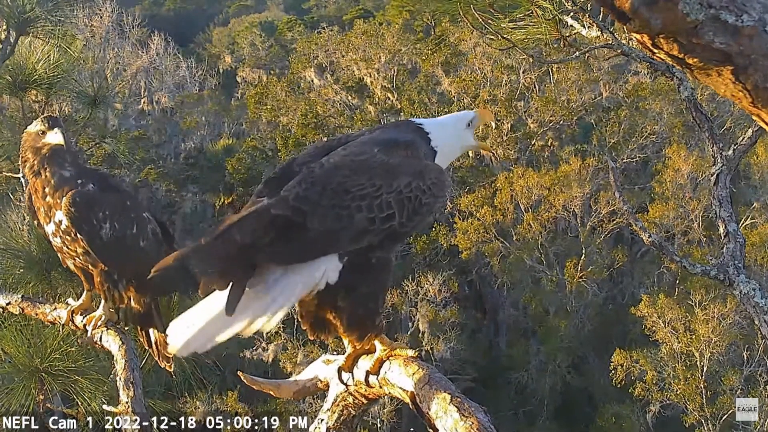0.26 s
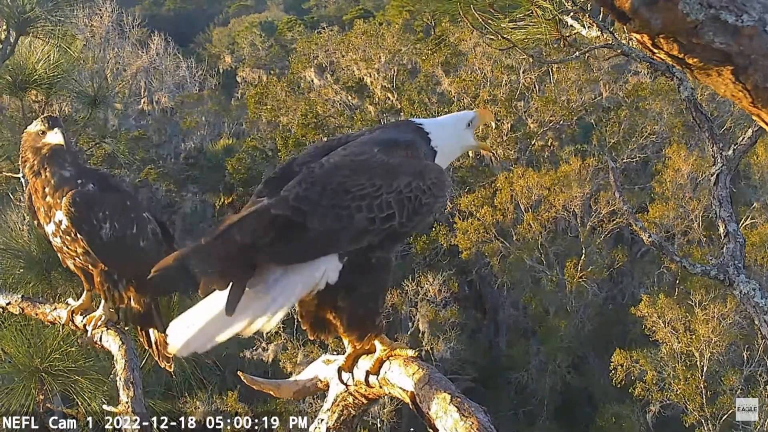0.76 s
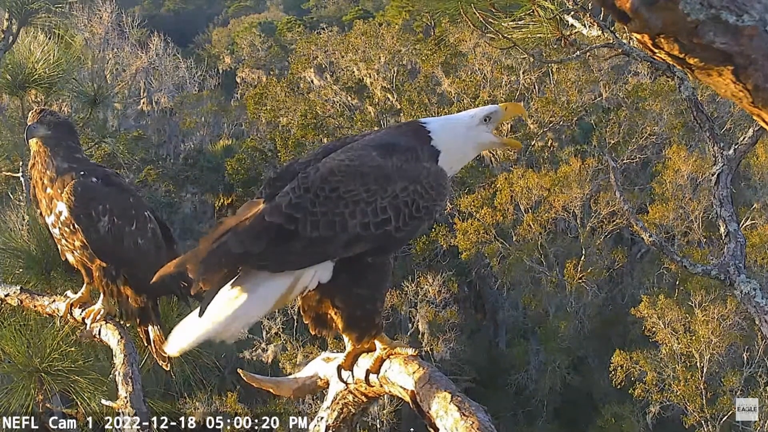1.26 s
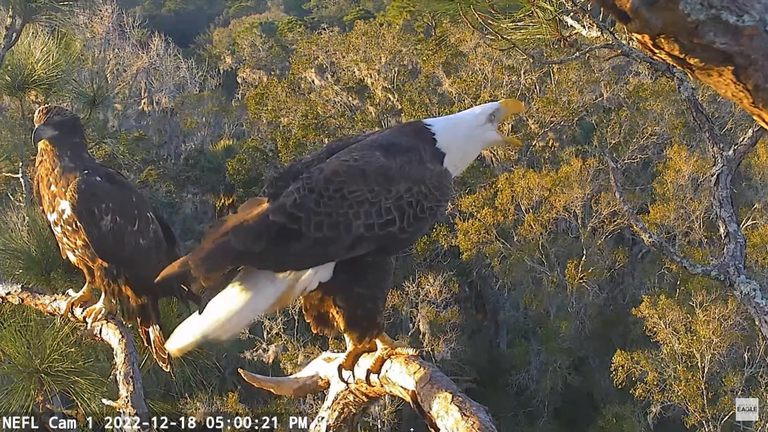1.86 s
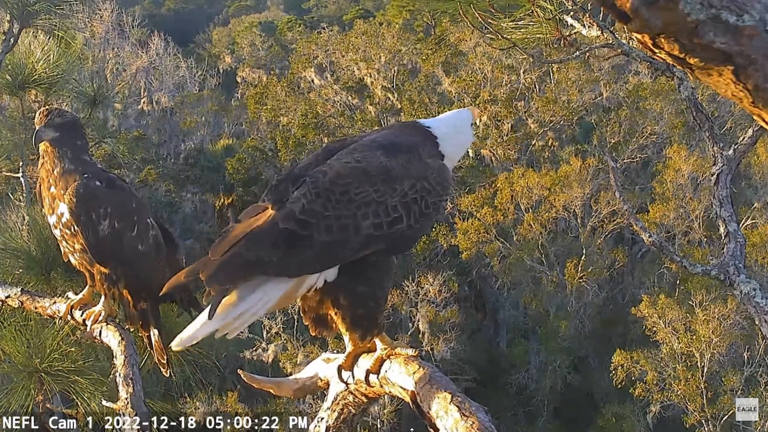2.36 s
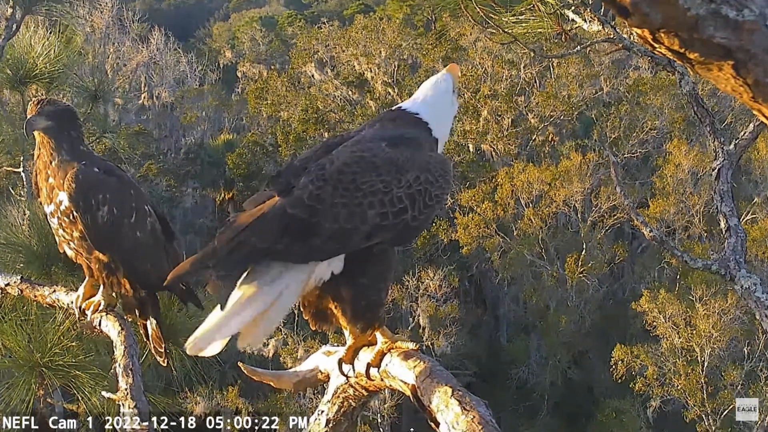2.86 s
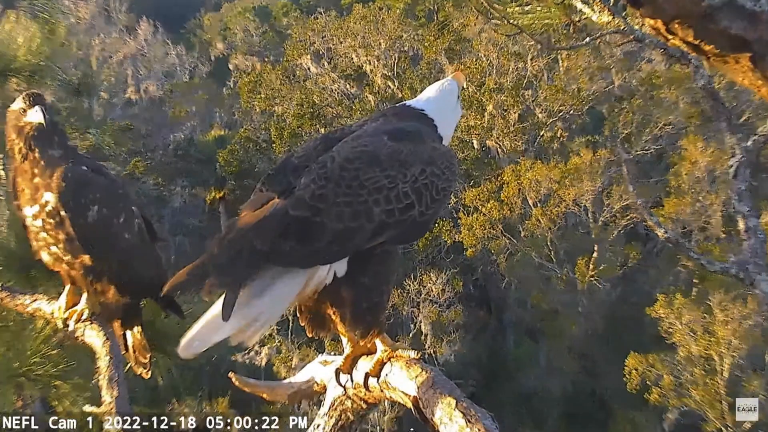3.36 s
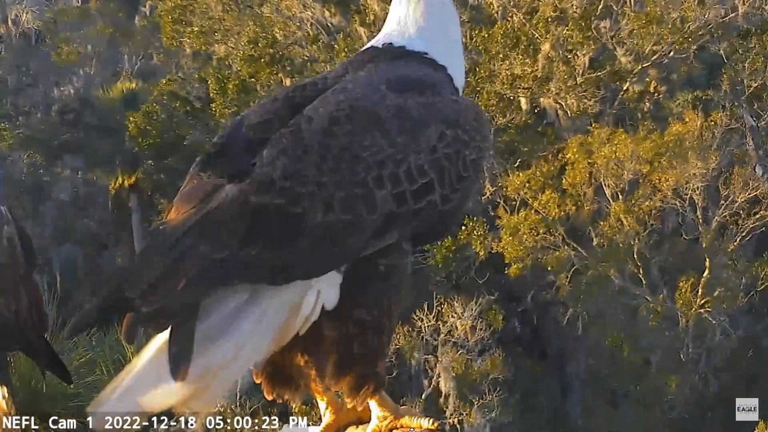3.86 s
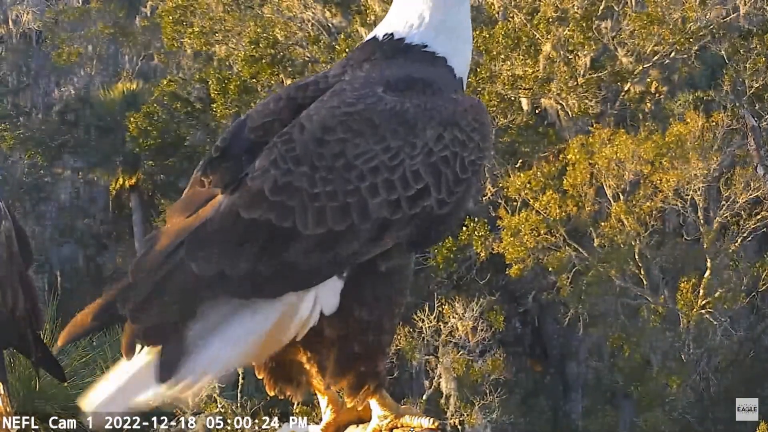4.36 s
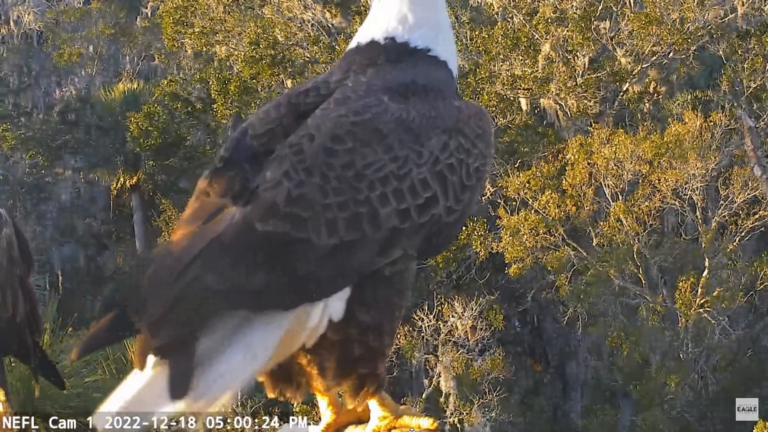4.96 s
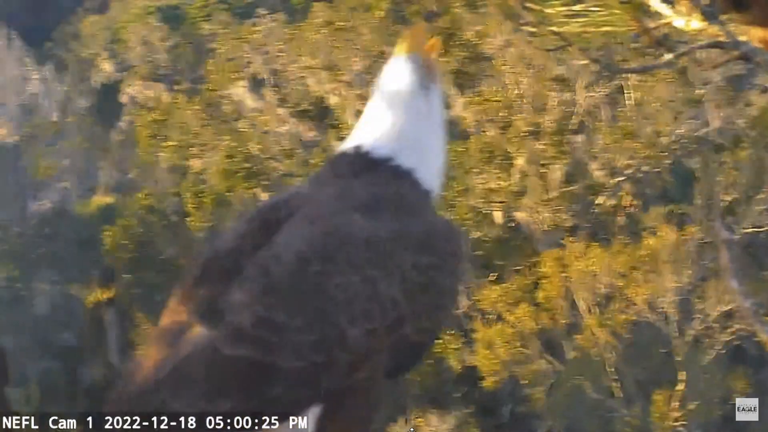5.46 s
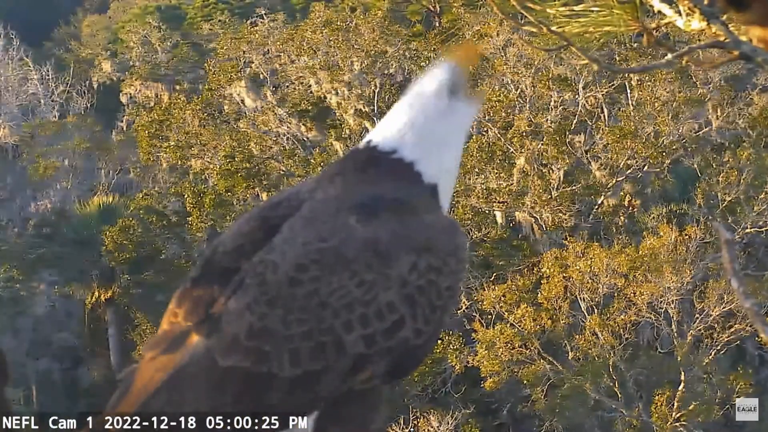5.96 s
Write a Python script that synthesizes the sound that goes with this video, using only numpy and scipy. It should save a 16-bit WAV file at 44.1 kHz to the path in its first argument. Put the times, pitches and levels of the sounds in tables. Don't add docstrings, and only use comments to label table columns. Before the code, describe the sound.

A close eagle chitters in rapid high whistles and squeaks, then a second answers with quick rising yelps and throaty chuckles, outdoors among trees.

```python
import sys
import numpy as np
from scipy import signal
from scipy.fft import rfft, irfft, next_fast_len
from scipy.io import wavfile
from scipy.ndimage import uniform_filter1d

SR = 44100
rng = np.random.default_rng(int(sys.argv[2]) if len(sys.argv) > 2 else 0)


def master(y):
    cut = np.clip(np.atleast_2d(y).T, -1, 1)
    pcm = np.round(cut * 32767)
    wavfile.write(sys.argv[1], SR, pcm.astype(np.int16))


def field_ratio(decibels):
    return 10 ** (np.asarray(decibels, dtype=float) / 20)


N = 272979

THIN_DB = -4.5
TICK_S = .0015


def rms_one(x):
    return x / np.sqrt(np.mean(x ** 2) + 1e-20)


def at_hz(points, hz):
    points = np.array(points)
    return np.interp(np.log(hz), np.log(points[:, 0]), points[:, 1])


def band(x, low_hz, high_hz):
    return signal.sosfilt(signal.butter(2, [low_hz, high_hz], "band", fs=SR, output="sos"), x)


def drift(rate_hz):
    smooth = signal.butter(2, rate_hz, fs=SR, output="sos")
    settled = signal.sosfilt(smooth, rng.standard_normal(N + SR))[SR:]
    return rms_one(settled)


def resonance(hz, peak_hz, width_hz):
    ring = 1 / (1 + 2j * (hz - peak_hz) / width_hz)
    return ring * np.abs(ring)


def swell(s, length, skew, flat):
    span = np.arange(round((s - .002) * SR), min(N, round((s + length + .002) * SR)))
    along = (span - span[0] + .5) / (length + .004) / SR
    puff = np.sin(np.pi * np.clip(along, 0, 1) ** skew) ** flat
    return span, along, puff


def background(patchy_db):
    # (frequency [Hz], density [dB per Hz])
    colour = [(18, -67), (30, -37), (247, -0.5), (581, -14.5), (859, -14), (1030, -28.5), (1200, -12),
              (2310, -27.5), (2630, -27), (13200, -41), (15000, -80)]
    floor_db, whine_hz, whine_db = -35.5, 13050, -66
    twig_s, twig_db = 3.186, -16
    size = next_fast_len(N)
    hz = np.maximum(np.arange(size // 2 + 1) * SR / size, 1)
    spectrum = rfft(rng.standard_normal((2, size))) * field_ratio(at_hz(colour, hz))
    noise = rms_one(irfft(spectrum, size)[:, :N])
    flicker = (field_ratio(patchy_db * drift(8.4)) - 1) * band(noise[0], 18, 1400)
    whine = field_ratio(whine_db) * rms_one(band(rng.standard_normal(N), whine_hz - 20, whine_hz + 20))
    twig = np.zeros(N)
    twig[round(twig_s * SR)] = field_ratio(twig_db)
    snap = band(band(twig, 3000, 11000), 3000, 11000)
    mid = field_ratio(floor_db) * (noise[0] + flicker) + whine + snap
    side = field_ratio(floor_db - 22.5) * band(noise[1], 270, 590)
    return mid + side * [[1], [-1]]


def whistles(flutter_db, breath_db, rattle_db):
    overtones = [-18.5, -25, -40, -34]
    # (frequency [Hz], level [dB])
    beak = [(2500, -10), (3700, -8), (4800, -13.5), (6100, -1.5), (7300, -1.5), (9000, -7.5), (12000, -19),
            (15500, -9.5)]
    pitch_waver, level_rasp, haze_db = .013, .45, -9.5
    out, air, weak = np.zeros(N), np.zeros(N), np.zeros(N)
    waver, rasp, flutter = drift(130), drift(290), field_ratio(flutter_db * drift(190))
    rows = score()
    for (s, length, start, middle, end, db, edge_db), turn in zip(rows, rng.random(len(rows))):
        span, u, puff = swell(s, length, skew=.8, flat=np.clip(.02 / length, .7, 2))
        shaky = np.clip(-db / 18, .1, 1) ** 1.3 * min(1, 4000 / middle) ** 2
        hz = start + (end - start) * u + 2 * (2 * middle - start - end) * u * (1 - u)
        cycles = np.cumsum(hz * (1 + pitch_waver * shaky * waver[span])) / SR
        phase = 2 * np.pi * (cycles + turn)
        tone = np.sin(phase)
        for k, level_db in enumerate(overtones, start=2):
            partial_db = level_db + edge_db - 8.1 * (k - 3) * shaky + at_hz(beak, k * hz)
            level = field_ratio(partial_db) * (k * middle < 16000) * flutter[span]
            tone += level * np.sin(k * phase)
        blown = field_ratio(db) * puff
        out[span] += blown * tone * (1 + level_rasp * shaky * rasp[span])
        air[span] += blown
        weak[span] += blown * (middle > 3700 and db < -11 or length <= TICK_S)
    hiss = band(band(rng.standard_normal(N), 3000, 8500), 3000, 8500)
    breath = rms_one(hiss) * np.tanh(air * 6) / 6
    crackle = rng.standard_normal(N) * (rng.random(N) < .03)
    crackle = crackle * uniform_filter1d(np.tanh(weak * 8), size=1500)
    crackle = signal.sosfilt(signal.butter(4, 7500, fs=SR, output="sos"), crackle)
    rattle = band(crackle, 3500, 3700) + band(crackle, 1560, 2040) / 2
    rattle = rattle + field_ratio(haze_db) * band(crackle, 850, 7300)
    return out + field_ratio(breath_db) * breath + field_ratio(rattle_db) * rattle


def score():
    rows = plain_notes() + bends() + snapped_notes() + brassy_notes() + strokes() + openers()
    rows += ticks() + squeaks() + slumps() + climbs() + slides() + held_notes() + stairs()
    return rows


def note(s, length, hz, db):
    # (frequency [Hz], change [share])
    glide = [(1350, -0.073), (1800, 0.08), (2350, 0.055), (2950, 0.016), (3400, 0.03), (4400, 0.052),
             (5700, -.05)]
    # (frequency [Hz], level [dB])
    edge = [(1350, 3.5), (1800, 7), (2300, 11), (2950, -1.5), (3400, -1.5), (4400, 3), (5500, 1),
            (7000, -15)]
    half = at_hz(glide, hz) / 2
    return s, length, hz * (1 - half), hz, hz * (1 + half), db, at_hz(edge, hz) + 0.24 * (db + 4.5)


def straight(s, length, start, end, db, edge_db):
    return s, length, start, (start + end) / 2, end, db, edge_db


def plain_notes():
    # (time [s], length [s], pitch [Hz], level [dB])
    low = [(0.05, 0.018, 2524, -25), (0.22, 0.018, 2430, -25), (0.225, 0.017, 1363, -21),
           (0.049, 0.036, 1570, -37), (1.16, 0.008, 1510, -20), (1.164, 0.0095, 2278, -11.5),
           (1.173, 0.019, 2394, -19.5), (1.313, 0.018, 1404, -23.5), (1.676, 0.014, 2600, -25),
           (1.991, 0.008, 2530, -32), (1.632, 0.0084, 1200, -27.5), (1.814, 0.017, 2524, -23.5),
           (1.959, 0.018, 2280, -35.5), (1.969, 0.015, 1414, -27.5), (1.984, 0.01, 1346, -12),
           (2.473, 0.015, 2467, -8.5), (2.487, 0.016, 2450, -20), (2.698, 0.0058, 1310, -19),
           (2.808, 0.013, 1285, -25.5), (3.786, 0.019, 1840, -15), (3.958, 0.012, 2410, -25),
           (5.821, 0.006, 2220, -18), (5.822, .008, 2750, -27), (1.546, 0.019, 2260, -13.5),
           (5.91, 0.0075, 2340, -22), (6.186, 0.0098, 1820, -19.5)]
    # (time [s], length [s], pitch [Hz], level [dB])
    middle = [(0.052, 0.026, 3363, -12), (0.332, 0.015, 2974, -2), (3.703, 0.025, 2900, -10.5),
              (1.377, 0.013, 3080, -25), (1.449, 0.0038, 3520, -16), (1.471, 0.013, 3370, -6),
              (1.574, 0.023, 3400, -17.5), (1.697, 0.0062, 3396, -5), (1.707, 0.0096, 3416, -13.5),
              (2.088, 0.022, 2961, -4), (3.439, 0.032, 3226, -17), (3.536, 0.02, 3370, -25),
              (3.666, 0.011, 3550, -11.5), (3.795, 0.0058, 3430, -4), (3.815, 0.015, 3400, -17),
              (3.952, 0.033, 3180, -22), (5.686, 0.0085, 3535, -2.5), (5.701, 0.0063, 3470, -9.5),
              (5.708, 0.02, 3450, -21), (5.84, 0.0092, 3340, -11.5), (5.846, .014, 3310, -23),
              (4.475, 0.018, 2386, -13.5), (4.174, 0.0087, 2964, -7), (4.187, 0.023, 3040, -24),
              (0.002, 0.098, 3470, -42.5), (3.546, .012, 3570, -27)]
    # (time [s], length [s], pitch [Hz], level [dB])
    high = [(0.003, 0.1, 4760, -44), (1.179, 0.0069, 3920, -17.5), (1.332, 0.014, 3870, -23),
            (1.49, 0.02, 4400, -28), (1.338, 0.039, 4140, -20), (1.395, 0.029, 3930, -25),
            (1.424, 0.012, 4230, -19), (1.432, 0.015, 4300, -11), (1.448, 0.0028, 4200, -16),
            (1.453, .005, 4340, -6), (1.457, 0.023, 4356, -14), (1.542, 0.0073, 3980, -22),
            (1.548, 0.027, 4410, -14), (1.667, .021, 4480, -22), (1.165, 0.0085, 4560, -24),
            (1.551, 0.013, 4720, -21), (2.087, 0.0085, 3820, -17), (2.174, 0.031, 3890, -29),
            (3.513, 0.014, 4530, -8.5), (3.526, 0.02, 4550, -11), (3.535, 0.017, 4450, -20),
            (3.504, 0.0042, 4400, -19), (3.725, 0.14, 4360, -36.5), (1.7, 0.011, 4470, -28),
            (3.55, 0.04, 4600, -25), (3.644, 0.0096, 4390, -16.5), (3.646, 0.032, 4630, -19.5),
            (5.471, 0.0077, 3940, -16), (5.534, 0.0091, 4600, -9), (5.539, 0.0063, 4390, 0.5),
            (5.543, 0.011, 4490, 0), (5.553, 0.0056, 4490, 1), (5.56, 0.0063, 4513, -2.5),
            (5.564, 0.0093, 4497, -11), (5.661, 0.0079, 4300, -12.5), (5.667, 0.013, 4500, -15)]
    # (time [s], length [s], pitch [Hz], level [dB])
    top = [
        (1.56, 0.009, 5290, -23),
        (2.245, 0.014, 6600, -22),
        (3.498, 0.005, 5800, -7),
        (3.506, 0.0088, 5500, -6.5),
        (3.519, 0.0087, 5490, -17),
        (3.636, 0.0032, 5500, -13.5),
        (5.52, 0.0066, 6460, -11.5),
        (5.527, 0.0047, 5690, -4),
        (5.529, 0.0072, 5400, -15.5),
    ]
    return [note(*row) for row in low + middle + high + top]


def woods(x, near_db, near_t60, far_db, far_t60):
    needles_db, needles_t60, bough_s, bough_db = -27.5, 0.06, 0.0098, -25.5
    still, sway_hz = .5, 90
    t = np.arange(SR // 2) / SR
    sparse = rng.standard_normal(len(t)) * (rng.random(len(t)) < .15)
    near = field_ratio(near_db) * rms_one(sparse) * field_ratio(-60 * t / near_t60) * (t > .004)
    far = field_ratio(far_db - 60 * t / far_t60) * rng.standard_normal(len(t))
    needles = field_ratio(needles_db - 60 * t / needles_t60) * rms_one(sparse[::-1]) * (t > .004)
    needles[round(bough_s * SR)] += field_ratio(bough_db)
    far = band(band(far, 1300, 7600), 1200, 7600)
    trunks = signal.fftconvolve(x * (still + drift(sway_hz)), far)[:N]
    branches = band(band(needles, 4900, 8600), 4900, 9300) + band(near, 680, 9100)
    return signal.fftconvolve(x, branches)[:N] + trunks


def bends():
    # (time [s], length [s], from [Hz], to [Hz], level [dB])
    bent = [(.364, 0.0024, 5500, 7100, -31), (.367, 0.017, 6980, 7440, -15),
            (0.388, 0.0049, 7560, 7850, -21), (0.391, 0.02, 7830, 5200, -17.5),
            (1.323, 0.015, 6100, 5870, -21), (1.334, 0.011, 5870, 4960, -24.5),
            (1.348, .006, 7860, 8800, -25), (1.354, 0.011, 8700, 7900, -28),
            (1.388, 0.016, 7500, 8000, -33), (1.431, .006, 9200, 8700, -26),
            (1.447, 0.0087, 8000, 7870, -25), (1.547, .008, 8560, 9300, -28),
            (1.557, 0.024, 10800, 9200, -30.5), (1.674, 0.013, 8200, 7800, -30),
            (2.09, 0.011, 9900, 9800, -37), (2.37, 0.022, 6100, 6200, -29.5),
            (1.406, 0.011, 3710, 4190, -29), (1.348, .005, 4570, 3500, -22),
            (1.362, 0.0054, 4400, 3300, -25), (1.438, 0.0046, 4480, 3370, -24),
            (0.065, .01, 7550, 8300, -27.5), (.057, 0.012, 10200, 9900, -32.5),
            (5.034, 0.0087, 3630, 4500, -26), (3.468, 0.013, 7000, 8300, -30),
            (3.575, 0.0074, 6740, 5770, -31), (3.633, 0.0087, 5650, 4680, -25),
            (3.648, .008, 5300, 4600, -18.5), (3.658, .008, 4500, 5030, -30),
            (5.39, 0.0073, 6820, 8260, -31), (3.34, .01, 6050, 5200, -21), (3.646, 0.011, 8300, 8150, -28),
            (3.67, 0.0085, 8240, 7900, -34), (3.63, 0.02, 7200, 7300, -46), (4.45, 0.018, 3750, 3580, -24),
            (4.7, .015, 3680, 3530, -32), (5.04, 0.013, 3670, 4060, -29.5), (5.615, 0.01, 3840, 4600, -31),
            (5.826, 0.021, 3450, 3105, -7), (5.884, 0.017, 4360, 4910, -40)]
    return [straight(*row, 5 if row[2] < 5000 else THIN_DB) for row in bent]


def snapped_notes():
    # (time [s], length [s], pitch [Hz], level [dB], tail level [dB])
    snaps = [
        (0.059, 0.005, 3414, -8, -23),
        (1.184, .014, 2998, 2.5, -31),
        (1.823, 0.0087, 3347, -2.5, -14),
        (2.368, 0.0082, 3066, -10, -23),
        (2.582, .011, 2080, -8.5, -20.5),
        (3.323, 0.0076, 2750, -7.5, -26),
        (3.596, 0.0046, 2950, -7, -22),
    ]
    rows = []
    for s, length, hz, db, tail_db in snaps:
        rows += [note(s, length, hz, db), note(s + length, .023, hz, tail_db)]
    return rows


def brassy_notes():
    # (time [s], length [s], pitch [Hz], level [dB])
    brassy = [
        (0.061, 0.0044, 4020, -23),
        (0.343, 0.017, 3023, -5.5),
        (0.356, 0.018, 3038, -12),
        (1.674, 0.0082, 4050, -22),
        (1.678, 0.021, 3473, -2.5),
        (1.832, 0.008, 4130, -20),
        (3.596, 0.026, 3010, -12),
        (3.801, 0.004, 3474, -5.5),
        (3.808, 0.006, 3476, -5),
        (5.672, 0.019, 3478, -3.5),
    ]
    rows = [note(*row) for row in brassy]
    return [(*row[:-1], row[-1] + 11.5) for row in rows]


def strokes():
    # (time [s], length [s], from [Hz], to [Hz], level [dB])
    thin = [(0.587, 0.0074, 5500, 4730, -29.5), (0.31, 0.02, 5400, 7660, -30),
            (3.302, 0.0063, 5250, 6830, -28.5), (3.464, 0.0036, 5900, 8360, -26),
            (0.597, 0.0083, 4520, 3970, -25), (.609, 0.0036, 4180, 3240, -29),
            (1.323, .002, 5200, 7100, -23), (1.446, 0.011, 2320, 2980, -15),
            (1.458, 0.0078, 3680, 3370, -19), (1.338, .018, 6000, 5840, -29),
            (1.432, 0.0047, 6250, 4770, -22), (2.236, 0.009, 6340, 4930, -26),
            (2.272, .005, 4400, 3300, -25), (2.344, .004, 7900, 6500, -24), (2.344, 0.015, 5850, 4860, -24),
            (2.444, 0.016, 5020, 6970, -30), (2.47, 0.0067, 5700, 3600, -21),
            (3.331, 0.0065, 5200, 6100, -16.5), (3.396, 0.0043, 5950, 5060, -19),
            (3.45, 0.0051, 4860, 5800, -22), (3.467, .006, 4450, 4920, -25), (3.474, 0.01, 6500, 5400, -19),
            (3.486, 0.0078, 5800, 6800, -17), (3.496, .018, 6700, 6550, -24), (3.568, .01, 5400, 6450, -27),
            (3.584, .005, 5730, 5200, -17), (3.636, 0.015, 5400, 5200, -32),
            (5.388, 0.0087, 3400, 4050, -21), (5.519, 0.0061, 5500, 6600, -18),
            (5.555, 0.03, 3510, 3420, -27)]
    return [straight(*row, THIN_DB) for row in thin]


def openers():
    # (time [s], level [dB])
    phrases = [
        (0.31, -26),
        (1.155, -26),
        (2.062, -20.5),
        (3.301, -23),
    ]
    sweep_hz = (2750, 3110, 3770)
    rows = []
    for s, db in phrases:
        rows += [(s, .024, *sweep_hz, db, 0), note(s, .027, 1956, db - 8.5)]
    return rows


def ticks():
    # (time [s], level [dB])
    loose = [(0.408, -17), (0.438, -21), (0.4587, -21.5), (0.4865, -27), (0.5046, -9.5), (0.5356, -20),
             (0.5684, -27), (0.6028, -14), (0.6137, -21), (0.635, -27), (0.6874, -26), (1.297, -22),
             (1.347, -15), (1.378, -20), (1.445, -9), (2.2128, -21), (2.2628, -7), (2.2928, -19),
             (2.3056, -26), (4.4867, -26)]
    # (time [s], level [dB])
    between = [(4.232, -19.5), (4.254, -14.5), (4.277, -17), (4.3, -17), (4.509, -16), (4.534, -39),
               (4.726, -16), (4.778, -21), (4.798, -19), (5.078, -35), (5.0864, -12), (5.102, -19),
               (5.1095, -16), (5.132, -21), (5.374, -11.5), (5.398, -15), (5.664, -8), (5.938, -23)]
    chirp_hz = (3750, 3150, 2800)
    return [(s - TICK_S / 2, TICK_S, *chirp_hz, db, -20) for s, db in loose + between]


def grunts(jitter, rasp_db):
    # (time [s], length [s], throat level [dB], chest level [dB])
    loose = [(0.446, 0.0089, -22, -26.5), (0.51, 0.023, -25, -30), (0.537, 0.012, -7.5, -20),
             (0.619, 0.007, -12, -23.5), (1.297, 0.0086, -14.5, -21.5), (1.382, 0.0087, -11, -19.5),
             (1.463, 0.0047, -12.5, -22), (2.298, 0.0072, -10.5, -18.5), (2.379, 0.0045, -13, -21.5),
             (3.422, 0.015, -23, -26), (3.442, 0.0022, -11.5, -21), (3.504, 0.002, -18, -20),
             (3.522, 0.011, -13, -23.5), (0.426, 0.003, -27, -23), (0.462, 0.0058, -19.5, -31),
             (2.2, 0.0089, -25, -33), (3.372, 0.02, -24.5, -37)]
    # (time [s], length [s], throat level [dB], chest level [dB])
    chuckle = [(4.191, 0.0089, -11, -24.5), (4.208, 0.015, -7, -14), (4.237, 0.0097, -11, -22),
               (4.258, 0.01, -13.5, -20), (4.286, 0.0055, -16, -26.5), (4.309, 0.01, -13, -30),
               (4.323, 0.024, -11.5, -17.5), (4.493, 0.0087, -18, -31), (4.515, 0.0076, -7.5, -31),
               (4.532, 0.0067, -14, -28), (4.732, 0.014, -8, -32), (4.751, 0.021, -12, -18.5),
               (4.78, 0.012, -9.5, -21.5), (4.8, 0.016, -10.5, -17), (4.819, 0.014, -14, -23),
               (5.072, 0.0064, -19, -25), (5.092, 0.013, -9.5, -23.5), (5.117, 0.0095, -7, -21),
               (5.134, 0.027, -10.5, -14.5), (5.36, 0.0032, -15, -28), (5.384, 0.0067, -8, -22.5),
               (5.406, 0.0055, -6.5, -27), (5.419, 0.024, -12, -16), (5.647, 0.0085, -14.5, -37),
               (5.669, 0.009, -7, -20), (5.687, 0.026, -12.5, -15.5), (5.925, 0.0035, -12.5, -26),
               (5.946, 0.011, -10, -23.5), (5.964, 0.029, -11.5, -13.5)]
    # (frequency [Hz], width [Hz], level [dB])
    formants = [
        (710, 400, -14),
        (1483, 180, 0.5),
        (2774, 230, -11.5),
        (5500, 7300, -42),
    ]
    base_hz, lower_hz_per_s = 450.8, 2140
    sag, chest_delay_s, hiss_db = 0.068, 0.0022, -31
    out, gate, unsteady = np.zeros(N), np.zeros(N), 1 + jitter * drift(99.0)
    orders = np.arange(2, 22)[:, None]
    for s, length, throat_db, chest_db in loose + chuckle:
        span, u, puff = swell(s, length, skew=.8, flat=.85)
        hz = (base_hz - lower_hz_per_s * length) * (1 - (0.075 + 5 * length) * u) * unsteady[span]
        phase = 2 * np.pi * np.cumsum(hz) / SR
        widen = 1 + sag * (.5 - u)
        throat = sum(field_ratio(db) * resonance(orders * hz, peak * widen, width) for peak, width, db in formants)
        rung = np.real(throat * np.exp(1j * orders * phase)).sum(axis=0)
        out[span] += field_ratio(throat_db) * puff * rung
        late = np.minimum(span + round(chest_delay_s * SR), N - 1)
        out[late] += field_ratio(chest_db) * puff * np.cos(phase)
        gate[span] += field_ratio(throat_db) * puff * (1 + np.cos(phase))
    leak = rms_one(band(rng.standard_normal(N), 1000, 5100))
    leak = leak + rms_one(band(rng.standard_normal(N), 4000, 9000)) / 8
    leak = leak * uniform_filter1d(gate, size=1300)
    rasp = rms_one(band(band(rng.standard_normal(N), 1800, 3600), 1800, 3600))
    return out + field_ratio(hiss_db) * leak + field_ratio(rasp_db) * gate * rasp


def squeaks():
    # (time [s], rise and hang [s], top pitch [Hz], level [dB], ghost level [dB])
    arches = [
        (0.465, 0.022, 7070, -20, -46),
        (2.219, 0.026, 6680, -21, -37),
        (2.32, 0.025, 6500, -26, -39.5),
        (3.34, 0.037, 7100, -25.5, -48),
    ]
    foot, shoulder, ghost = .795, .87, 1.22
    rise_s, drop_s, drop_hz, drop_db = .002, .0125, 5200, 5.5
    rows = []
    for s, d, hz, db, ghost_db in arches:
        rows += [
            (s, rise_s, foot * hz, (foot + shoulder) / 2 * hz, shoulder * hz, db, 0),
            (s + rise_s, d - rise_s, shoulder * hz, .97 * hz, hz, db, 6),
            (s + d, drop_s, hz, .6 * hz + 0.32 * drop_hz, drop_hz, db + drop_db, 0),
            (s, d + drop_s, foot * hz, ghost * hz, foot * hz, ghost_db, THIN_DB)]
    return rows


def slumps():
    # (time [s], length [s], pitch [Hz], level [dB])
    sagging = [
        (0.701, 0.0125, 3084, -18.5),
        (3.617, 0.015, 5200, -15),
    ]
    share = .124
    return [(s, d, hz * (1 + share), hz, hz * (1 - share), db, 0) for s, d, hz, db in sagging]


def climbs():
    # (time [s], length [s], hold level [dB], climb level [dB])
    climbing = [
        (1.239, 0.034, -3.5, -5.5),
        (2.13, 0.052, -4.5, -0.5),
    ]
    hold_hz, climb_hz, catch_s = 2950, 3223, .0043
    rows = []
    for s, d, hold_db, db in climbing:
        hold = d * 0.48
        rows += [note(s, hold + catch_s, hold_hz, hold_db),
                 straight(s + hold, d - hold, hold_hz, climb_hz, db, 0)]
    return rows


def slides():
    # (time [s], level [dB])
    faint = [
        (2.255, -29),
        (2.354, -29),
    ]
    return [(s, .0154, 5400, 4300, 3300, db, THIN_DB) for s, db in faint]


def held_notes():
    # (time [s], length [s], pitch [Hz], level [dB], sag at both ends [share])
    held = [
        (3.391, 0.0575, 3361, -3.5, 0.042),
        (5.396, .074, 4330, -2, .09),
    ]
    return [(s, d, hz * (1 - sag), hz, hz * (1 - sag), db, 0) for s, d, hz, db, sag in held]


def stairs():
    # (time [s], wait for second step [s], first step [Hz], its level [dB], third step level [dB])
    calls = [
        (4.148, 0.0057, 1956, -17.5, -30),
        (4.447, 0.014, 1868, -4.5, -13.5),
        (4.69, 0.0084, 1833, -6.5, -20),
        (5.026, 0.0084, 1820, -15, 1),
        (5.314, 0.0062, 1853, -7.5, 2),
        (5.601, 0.0074, 1826, -12, -4.5),
        (5.877, 0.008, 1845, -16.5, -28),
    ]
    second_levels = [-13.5, -11.5, -13, -10.5, -10, -11, -10]
    lead_s, lead_hz, lead_db = .0064, 1340, -34.5
    first_rise, second_hz, second_rise = .033, 2343, .054
    rows = []
    for (s, wait, hz, db, third_db), second_db in zip(calls, second_levels):
        rows += [
            straight(s - lead_s, lead_s, lead_hz, hz, lead_db, THIN_DB),
            (s, .013, hz * (1 - first_rise), hz, hz * (1 + first_rise), db, 10),
            (s + wait, .024, second_hz * (1 - second_rise), second_hz, second_hz * (1 + second_rise),
             second_db, 7.5),
            note(s + .03156, .006, 2950, third_db)]
    return rows


def scene():
    birds = whistles(flutter_db=3.5, breath_db=-29.5, rattle_db=-0.5) + grunts(jitter=0.0658, rasp_db=-21)
    tail = woods(birds, near_db=-40, near_t60=.12, far_db=-57.5, far_t60=1.13)
    return birds + tail + background(patchy_db=1.0)


def low_pass(x):
    return signal.sosfilt(signal.butter(12, 15700, fs=SR, output="sos"), x)


def record(dry):
    high_pass = signal.butter(4, 300, "high", fs=SR, output="sos")
    bent = dry + 0.011 * signal.sosfilt(high_pass, dry ** 2)
    top, knee = .95, 3.5
    flat = bent / (1 + np.abs(bent / top) ** knee) ** (1 / knee)
    edges = signal.butter(4, [56, 15400], "band", fs=SR, output="sos")
    wall = signal.cheby2(10, 60, 15900, fs=SR, output="sos")
    mix = signal.sosfilt(np.vstack([edges, wall]), flat)
    return low_pass(mix)


dry = scene()
out = record(dry)
master(out)
```